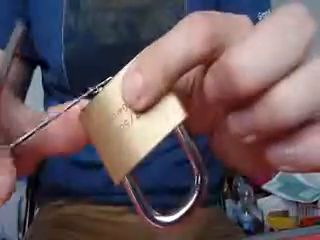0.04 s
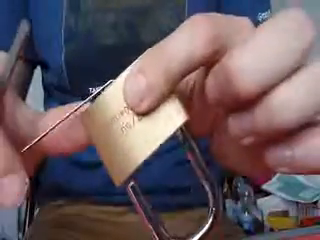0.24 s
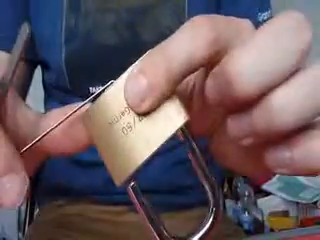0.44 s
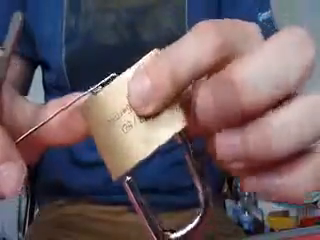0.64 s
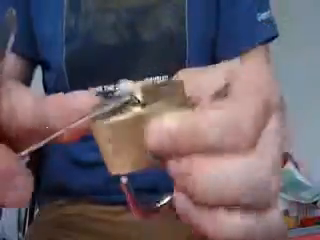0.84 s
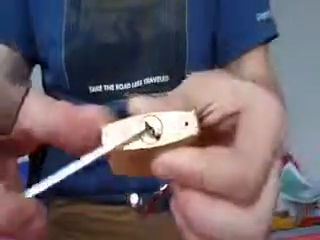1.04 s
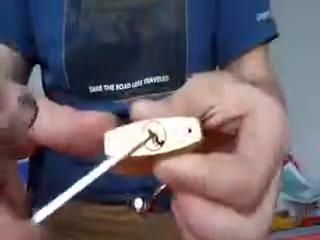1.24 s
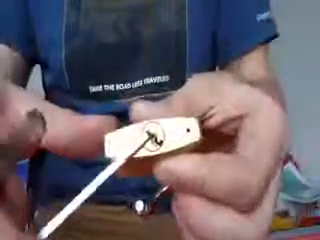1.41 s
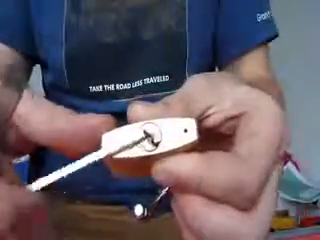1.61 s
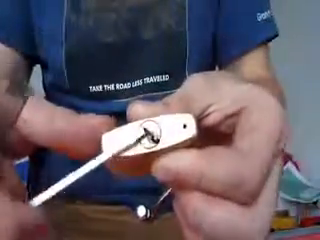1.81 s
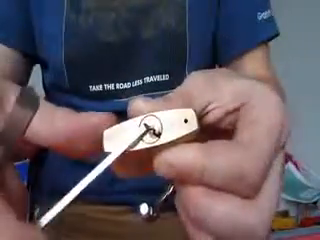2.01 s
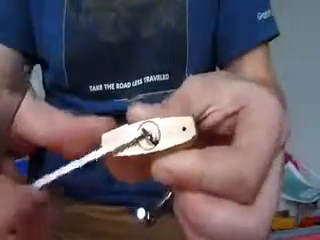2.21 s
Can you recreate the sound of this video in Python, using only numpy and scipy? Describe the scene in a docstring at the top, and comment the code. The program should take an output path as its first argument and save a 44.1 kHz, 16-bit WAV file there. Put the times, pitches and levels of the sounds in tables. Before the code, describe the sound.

A small brass padlock snaps open at about 0.2 seconds with one sharp, bright metallic click, close up. The shackle and the room ring briefly, fading within half a second. A tension wrench then ticks very faintly in the keyway around 1 second and again near 2 seconds. Soft room hiss, a low hum and a barely audible thin whine continue underneath throughout.

```python
"""A small brass padlock is picked open, close up: the bolt lets go, the shackle scrapes out and slams
on its stop, all within 20 ms. Each contact cracks, rings the metal and thumps the body. The room and
the freed shackle ring on while an automatic gain control ducks and recovers. Then the tension wrench
ticks faintly in the keyway, over room hiss, a low hum, a thin whine and tiny specks of treble."""
import sys
import numpy as np
from scipy import signal
from scipy.fft import rfft, irfft, next_fast_len
from scipy.io import wavfile
from scipy.ndimage import uniform_filter1d, minimum_filter1d, map_coordinates

SR = 44100
rng = np.random.default_rng(int(sys.argv[2]) if len(sys.argv) > 2 else 0)


def dump(signal):
    """Clip the signal to [-1, 1] and save it as 16-bit WAV at the path in sys.argv[1]."""
    limited = np.clip(np.atleast_2d(signal).T, -1, 1)
    pcm = np.round(limited * 32767).astype(np.int16)
    wavfile.write(sys.argv[1], SR, pcm)


N = 103635

# Metal contacts as the lock opens; thump and crack are relative to the level, glancing hits rise slower:
# start_s, level_db, centre_hz, thump_db, crack_db, ring_stretch, rise_s
CONTACTS = [(.2175, -27, 4800, 0.5, -24, 1, 0.00033), (.2179, -21, 1860, -18, -29, 1, .0005),
            (.2191, -14, 5030, -9.5, -32, .7, 0.00018), (.2202, -7.5, 1880, -7.5, -19, .7, 0.00025),
            (.2255, -15, 3300, -7, -11, 1, 0.0012), (.2267, -10, 5060, -32, -19, 1, 0.00086),
            (.2286, -9.5, 3050, -43, -29, 1.6, 0.0014), (.2338, 11, 4150, -9, -21, .9, 0.00024),
            (.2353, 0, 3250, -5, -17, 1, 0.00077)]


def amp(db):
    """Decibels to gain."""
    return 10 ** (np.asarray(db) / 20)


def unit(x):
    """Scale to rms 1."""
    return x / np.sqrt(np.mean(x ** 2) + 1e-20)


def along(points, hz):
    """(Hz, value) points on a log axis."""
    f, v = np.transpose(points)
    return np.interp(np.log(hz + 1), np.log(f + 1), v)


def wobble(rate):
    """A smooth random curve, rate knots a second."""
    return map_coordinates(rng.standard_normal(1024), [np.arange(N) * rate / SR], mode="wrap")


def filtered(x, response):
    """x times a response of frequency."""
    m = next_fast_len(N + SR // 2)
    return irfft(rfft(x, m) * response(np.fft.rfftfreq(m, 1 / SR)), m)[:N]


def room_hiss():
    """A steady bed of dark noise."""
    spectrum = [(25, -33), (42, -1), (54, -12.5), (74, -3.5), (110, -2), (180, 1.5), (270, -0.5), (450, -3),
                (700, -6), (1000, -5.5), (1500, -9.5), (2100, -10.5), (3000, -13), (5000, -19),
                (6300, -25.5), (7200, -36), (10500, -38), (12000, -41)]  # frequency_hz, gain_db
    noise = filtered(rng.standard_normal(N), lambda hz: amp(along(spectrum, hz)))
    return amp(-51) * unit(noise)


def low_hum():
    """A deep tone that swells and sinks, its pitch drifting slightly."""
    swell = [(0, -81), (.4, -65), (.85, -76), (1.1, -66), (1.4, -63.5), (1.65, -71), (1.85, -75),
             (2.1, -67), (2.35, -69)]  # time_s, level_db before the trim
    pitch_hz, trim_db = 52.5, 0.5
    t = np.arange(N) / SR
    tone = unit(np.sin(2 * np.pi * pitch_hz * t + .5 * wobble(5.3)))
    return amp(trim_db + np.interp(t, *np.transpose(swell))) * tone


def thin_whine():
    """Three faint, wavering tones that pulse together, a little unevenly."""
    partials = [(953, -68), (1906, -68), (2930, -74)]  # pitch_hz, level_db
    waver_hz, pulse_hz, swing_db = 16, 9, 8.5
    t = np.arange(N) / SR
    pulse = amp(swing_db * np.tanh(2 * np.sin(2 * np.pi * pulse_hz * t + wobble(3.56))))
    return sum(amp(db) * unit(pulse * np.sin(2 * np.pi * hz * t + wobble(waver_hz)))
               for hz, db in partials)


def treble_specks():
    """Tiny dry ticks: single impulses narrowed to a band high in the treble."""
    specks = [(.1105, -36), (.2965, -34), (.343, -39), (.4828, -32), (.5293, -31), (.715, -41),
              (.8545, -40), (.994, -38), (1.0405, -39), (1.1797, -39), (1.2262, -41), (1.7845, -37),
              (2.0167, -39), (2.2488, -38)]  # start_s, level_db before the filter
    centre_hz, width_oct = 7440, .3
    impulses = np.zeros(N)
    for start_s, db in specks:
        impulses[round(start_s * SR)] = amp(db)
    return filtered(impulses, lambda hz: np.exp(-.5 * (np.log2((hz + 1) / centre_hz) / width_oct) ** 2))


def lock_strikes(hits):
    """Each contact cracks, rings the lock's modes near its centre frequency and thumps the body."""
    modes = [(630, -11, 0.023), (1800, -1, 0.0052), (2394, -11.5, 0.017), (2816, -6, 0.0086),
             (3408, -5.5, 0.0098), (4000, -9.5, 0.013), (4440, -8, 0.015), (4927, -3.5, 0.011),
             (5600, -14, 0.012), (6270, -9.5, 0.0085), (8640, -19, 0.006), (9900, -26, .005)]  # damped by the hand: pitch_hz, level_db, t60_s before the stretch
    crack_t60_s, thump_hz, thump_t60_s = 0.011, 273, 0.0036
    radiates_above_hz = 250
    out, t = np.zeros(N + SR), np.arange(SR // 10) / SR
    fade = lambda t60_s: 1000 ** (-t / t60_s)
    for start_s, db, centre_hz, thump_db, crack_db, ring_stretch, rise_s in hits:
        ring = 0
        for k, (hz, mode_db, t60_s) in enumerate(modes):
            off_centre_db = 8 * np.log2(hz / centre_hz) ** 2
            gain = amp(mode_db + rng.normal(0, 0.45) - off_centre_db)
            ring += (-1) ** k * gain * fade(t60_s * ring_stretch) * np.sin(2 * np.pi * hz * t)
        crack = amp(crack_db) * fade(crack_t60_s) * rng.standard_normal(len(t))
        thump = amp(thump_db) * fade(thump_t60_s) * np.sin(2 * np.pi * thump_hz * t)
        attack = 1 - np.exp(-t / rise_s)
        out[round(start_s * SR):][:len(t)] += amp(db) * (ring + crack + thump) * attack
    return signal.lfilter(*signal.butter(1, radiates_above_hz, "highpass", fs=SR), out[:N])


def room_wash(hits):
    """The contacts come back from all sides as a diffuse wash; each frequency dies at its own speed."""
    colour = [(100, -28), (700, -23.5), (1200, -14.5), (2000, -7), (3300, -4), (3850, -4.5), (4150, 0),
              (4400, 2.5), (4700, -3.5), (5100, -5), (6200, -10), (7200, -23), (10000, -26.5), (12000, -29)]  # frequency_hz, gain_db
    decay = [(200, 0.8), (1500, 0.51), (3000, 0.5), (4400, 0.54), (6500, 0.44), (11000, 0.52)]  # frequency_hz, t60_s
    send_db, predelay_s = 7.5, 0.0044
    out = np.zeros(N + 2 * SR)
    for start_s, db, *_ in hits:
        hz, t, noise = signal.stft(rng.standard_normal(SR), SR, nperseg=256)
        fade = amp(-60 * t / along(decay, hz)[:, None])
        tail = signal.istft(noise * fade, SR, nperseg=256)[1]
        tail /= np.linalg.norm(tail)
        out[round((start_s + predelay_s) * SR):][:len(tail)] += amp(db + send_db) * tail
    return filtered(out[:N], lambda hz: amp(along(colour, hz)))


def shackle_ring():
    """The freed steel loop rings faintly from the hardest contact on."""
    modes = [(4500, -28, 0.32), (4370, -45, 0.69), (4800, -46, 0.26), (4955, -29, 0.23)]  # pitch_hz, level_db, t60_s
    slam_s = max(CONTACTS, key=lambda row: row[1])[0]
    t = np.maximum(np.arange(N) / SR - slam_s, 0)
    return sum(amp(db - 60 * t / t60_s) * np.sin(2 * np.pi * hz * t) for hz, db, t60_s in modes)


def scene():
    """The lock opens and the wrench ticks over the room's quiet bed, in mono."""
    wrench_ticks = [(.9490, -37.5, 2300, -13, -22, 1.2, .0002), (.9503, -37, 2550, -15, -22, 1.2, .0002),
                    (1.0698, -42.5, 5400, -14, -24, 1.1, 0.00028),
                    (1.099, -44, 4970, -20, -24, 2.1, 0.00091), (1.944, -43, 1900, -15, -35, 4.4, 0.0027),
                    (1.952, -41, 1900, -17, -37, 3.4, 0.0024), (2.007, -47.5, 5200, -20, -30, 3, .002)]  # in the keyway; same columns as CONTACTS
    hits = list(CONTACTS) + list(wrench_ticks)
    padlock = lock_strikes(hits) + room_wash(hits) + shackle_ring()
    bed = room_hiss() + low_hum() + thin_whine() + treble_specks()
    return (padlock + bed)[None]


def record(dry):
    """Gain control ducks at once, holds and recovers in two stages; the microphone softens the top."""
    microphone = [(20, 0), (9000, -1), (10800, -3), (11600, -11), (12500, -23)]  # frequency_hz, gain_db
    threshold_db, detect_s, hold_s = -13, 0.0016, 0.072
    fast_release_s, slow_release_s, slow_share = 0.1, 0.8, 0.19
    band_limit_hz = 11700
    x, t = dry[0], np.arange(N) / SR
    window, hold = round(detect_s * SR), round(hold_s * SR)
    level_db = 10 * np.log10(np.abs(uniform_filter1d(x ** 2, window)) + 1e-12)
    over_db = np.maximum(level_db - threshold_db, 1e-6)
    held_db = -minimum_filter1d(-over_db, hold, origin=(hold - 1) // 2)
    # Jump to each new peak, then fall away exponentially.
    release = lambda tau: np.exp(np.maximum.accumulate(np.log(held_db) + t / tau) - t / tau)
    duck_db = (1 - slow_share) * release(fast_release_s) + slow_share * release(slow_release_s)
    ducked = x * amp(-uniform_filter1d(duck_db, window))
    coloured = filtered(ducked, lambda hz: amp(along(microphone, hz)))
    return filtered(coloured, lambda hz: 1 / np.sqrt(1 + (hz / band_limit_hz) ** 80))[None]


dry = scene()
out = record(dry)
dump(out)
```